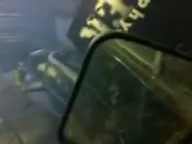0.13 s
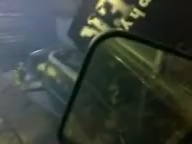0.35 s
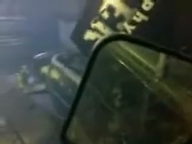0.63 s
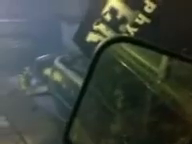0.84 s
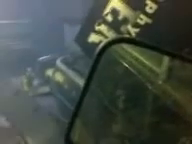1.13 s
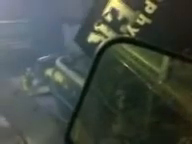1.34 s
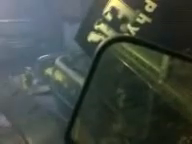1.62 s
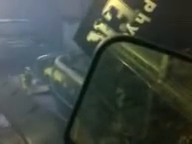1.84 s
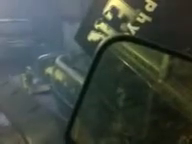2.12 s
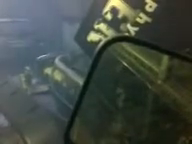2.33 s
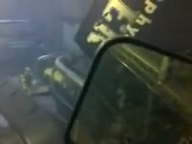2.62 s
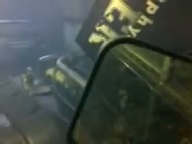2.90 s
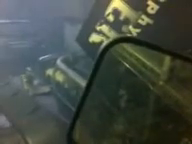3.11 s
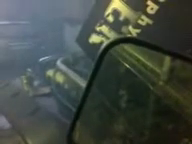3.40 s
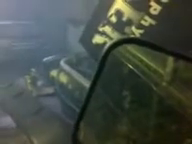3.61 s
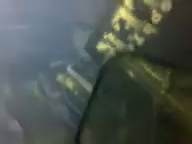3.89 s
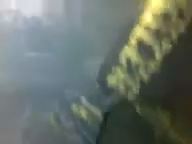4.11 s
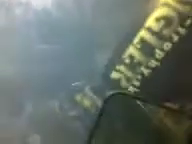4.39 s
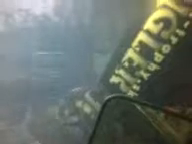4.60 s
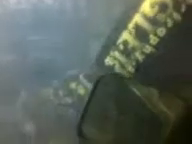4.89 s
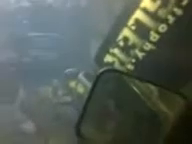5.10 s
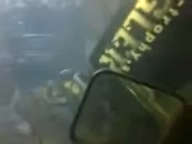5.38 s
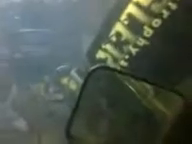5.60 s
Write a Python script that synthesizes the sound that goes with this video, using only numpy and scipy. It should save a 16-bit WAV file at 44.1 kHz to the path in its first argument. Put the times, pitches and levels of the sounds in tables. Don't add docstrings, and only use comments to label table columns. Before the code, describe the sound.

A turbocharged car engine, already at high revs, falls away quickly in an enclosed hall. Two sharp knocks crack almost together at the start, a cluster of pops follows near one second, then the roar sinks to a lumpy, hissing idle. At the very end the throttle opens and the pitch jumps up. The microphone is dull and narrow-band, overloading on the knocks.

```python
import sys
import numpy as np
from scipy import signal
from scipy.io import wavfile
from scipy.ndimage import uniform_filter1d

SR = 44100
rng = np.random.default_rng(int(sys.argv[2]) if len(sys.argv) > 2 else 0)


def nominal_scale(level):
    x = np.asarray(level, float) / 20
    return 10 ** x


def persist_wave(psi):
    counts = np.round(np.clip(psi, -1, 1) * 32767).astype(np.int16)
    wavfile.write(sys.argv[1], SR, np.atleast_2d(counts).T)


N = 254016

# time in seconds, speed in turns per second.
SPEED_TURNS_PER_S = [(0, 141), (.35, 115.6), (.7, 96.5), (.9, 93), (1.17, 68), (1.45, 59.5), (1.76, 52),
                     (2.05, 51), (2.5, 42.6), (2.75, 41.2), (3.5, 39), (4.6, 38.2), (4.95, 39), (5.5, 39),
                     (5.575, 43.5), (5.64, 51), (5.7, 57), (5.76, 62)]
# time in seconds, roar level in dB.
ROAR_DB = [(0, -16), (.46, -19), (.59, -22), (.74, -22), (.87, -25), (1.1, -27.5), (1.4, -29), (1.8, -29.5),
           (2.15, -31.5), (3.85, -33.5), (4.5, -35.5), (4.85, -35.5), (4.95, -35), (5.45, -35.5),
           (5.58, -34.5), (5.76, -30.5)]


def evened(x):
    return x / np.sqrt(np.mean(x ** 2) + 1e-20)


def curve(table, t):
    s, *columns = np.transpose(table)
    return [np.interp(t, s, c) for c in columns]


def read(points, hz):
    f, value = np.transpose(points)
    return np.interp(np.log(hz + 1), np.log(f + 1), value)


def band_db(colour_db, hz, lo, hi):
    power = nominal_scale(colour_db[:, (hz > lo) & (hz < hi)]) ** 2
    return 10 * np.log10(power.sum(1, keepdims=True))


def add(mix, s, sound):
    part = mix[round(s * SR):][:len(sound)]
    part += sound[:len(part)]


def drift(shape, size):
    once = uniform_filter1d(rng.standard_normal(shape), size, axis=0)
    return evened(uniform_filter1d(once, size, axis=0))


def field(colour_db, patchy_db, flicker_db):
    a, b, patches = rng.standard_normal((*colour_db.shape, 3)).T
    patches = uniform_filter1d(patches, size=10, axis=0)
    patches = evened(uniform_filter1d(patches, size=10, axis=1))
    flicker = drift(len(colour_db), size=3)
    z = (a + 1j * b) * nominal_scale(colour_db.T + patchy_db * patches + flicker_db * flicker)
    noise = signal.istft(z, nperseg=2048, noverlap=1536)[1]
    return noise[1024:N + 1024] * np.sqrt(512 / 3)


def stumble_db(t):
    # middle in seconds, boom change in dB, half length in seconds.
    boom_dips = [(0.052, -3, 0.046), (.21, -24, 0.035), (.31, -13.5, 0.039), (0.432, -18.5, 0.017),
                 (.68, -2, 0.078), (1.1, -11.5, 0.091), (1.294, -12.5, .04), (1.672, -11.5, .1),
                 (1.922, -8, 0.12), (2.45, -5, .04), (2.639, -8, .035), (3.633, -8, .06),
                 (3.897, -3.5, 0.091), (4.699, -3, 0.081), (5.041, -9.5, .05), (5.36, -2, .06),
                 (5.58, -19.5, 0.043), (5.656, -14, .025)]
    return sum(db * np.exp(-((t - s) / half_s) ** 2) for s, db, half_s in boom_dips)


def throttle(t):
    open_s, rise_s = 5.6, 0.1536
    return np.clip((t - open_s) / rise_s, 0, 1)


def overrun(t):
    start_s, end_s, edge_s = 1.0, 2.394, 0.09
    return np.clip(np.minimum(t - start_s, end_s - t) / edge_s + .5, 0, 1)


def air_level(t):
    idle_db, octave_db, idle_turns_per_s = -44.5, 8, 39
    return idle_db + octave_db * np.log2(curve(SPEED_TURNS_PER_S, t)[0] / idle_turns_per_s)


FUEL_BACK_S = 2.0


def crank():
    t = np.arange(N) / SR
    sag_per_db, sag_delay_s = .0035, .03
    sag = -sag_per_db * stumble_db(t - sag_delay_s) * (t > FUEL_BACK_S)
    speed = curve(SPEED_TURNS_PER_S, t)[0] * (1 - sag + .004 * drift(N, size=1500))
    return speed, np.cumsum(speed) / SR


def ticks():
    ticks_per_s = 160
    size = nominal_scale(3.2 * np.minimum(rng.exponential(1, N), 4))
    size = size * (rng.random(N) < ticks_per_s / SR) * rng.choice([-1, 1], N)
    band = signal.butter(3, [3700, 4300], "bandpass", fs=SR, output="sos")
    return nominal_scale(air_level(np.arange(N) / SR) - 28.5) * evened(signal.sosfilt(band, size))


def panel():
    # middle in seconds, peak in dB, pitch in Hz, length in seconds.
    songs = [(0.091, -19.5, 760, 0.077), (0.115, -23.5, 308.6, .08), (0.118, -33, 121.3, .07),
             (.22, -23, 485, 0.051), (0.337, -29.5, 296.5, 0.095), (0.439, -26.5, 298, 0.1),
             (0.893, -30, 300, 0.079), (.89, -24, 494, 0.056), (.92, -28.5, 227, .06),
             (0.926, -33.5, 132, 0.069), (0.652, -25, 1307, .1), (.995, -21.5, 1335, .09),
             (1.1, -24.5, 1420, 0.048), (1.147, -29, 1446, 0.042), (1.383, -25, 1340, 0.056),
             (1.621, -29, 1340, 0.062), (2.108, -29, 1306, 0.065), (1.332, -36, 3560, .05),
             (2.516, -37, 1340, 0.055), (3.183, -31.5, 1400, 0.063), (3.495, -33.5, 1090, 0.069),
             (3.755, -37.5, 1672, .1), (4.56, -36, 1680, 0.097), (4.906, -37, 1560, 0.052),
             (5.58, -32.5, 1365, 0.053), (5.625, -39, 118, 0.0495), (5.701, -34, 1355, 0.084)]
    out = np.zeros(N)
    for s, db, pitch_hz, length_s in songs:
        t = np.arange(0, length_s, 1 / SR)
        pitch_wobble, level_wobble = drift((8000, 2), size=150)[:len(t)].T
        tone = np.sin(2 * np.pi * np.cumsum(pitch_hz * (1 + 0.015 * pitch_wobble)) / SR)
        swell = nominal_scale(db + 1.0 + 2.8 * level_wobble) * np.sin(np.pi * t / length_s)
        add(out, s - length_s / 2, swell * tone)
    return out


def intake(turns):
    # crank order, level at idle in dB.
    intake_orders = [(1.5, -61), (2, -52.5), (4, -62.5), (6, -53), (9, -55.5), (12, -54.5), (15, -56.5),
                     (18, -54.5)]
    t = np.arange(N) / SR
    roar_db = uniform_filter1d(curve(ROAR_DB, t)[0], size=15000)
    tones = np.zeros(N)
    for k, db in intake_orders:
        waver_db = (1 + .15 * k) * drift(N, size=3000)
        tones += nominal_scale(db + waver_db) * np.sin(2 * np.pi * (k * turns + rng.random()))
    overrun_db = -6.5
    return tones * nominal_scale(.4 * (roar_db + 35) + overrun_db * overrun(t))


def pops():
    # start in seconds, level in dB, pitch in Hz, t60 in seconds.
    puffs = [
        (.43, -21.5, 300, 0.12),
        (.856, -19.5, 390, 0.1),
        (0.877, -9.5, 480, 0.059),
        (.884, -16, 330, 0.0475),
        (.902, -14.5, 654, 0.057),
        (.916, -19, 360, 0.08),
        (1.038, -27, 355, 0.16),
        (2.101, -26, 889, 0.049),
        (5.606, -25.5, 1300, 0.025),
    ]
    out, t = np.zeros(N), np.arange(8000) / SR
    for s, db, pitch_hz, t60_s in puffs:
        band = signal.butter(4, [.45 * pitch_hz, 2.2 * pitch_hz], "bandpass", fs=SR, output="sos")
        puff = evened(signal.sosfilt(band, rng.standard_normal(len(t))))
        add(out, s, nominal_scale(db - 60 * t / t60_s) * (1 - np.exp(-t / 0.0028)) * puff)
    return out


def knocked(engine):
    # time in seconds, peak in dB, sign.
    hard_knocks = [
        (.1177, -1, 1),
        (.124, -1, -1),
    ]
    u, hush, out = np.arange(-60, 61) / SR, np.zeros(N), np.zeros(N)
    bell = np.exp(-(u / .0005) ** 2)
    for s, db, sign in hard_knocks:
        add(hush, s - 60 / SR, bell)
        add(out, s - 60 / SR, sign * nominal_scale(db - 1.1) * np.cos(2 * np.pi * 1600 * u) * bell)
    return engine * (1 - hush) + out


def boom(speed, turns):
    # crank order, rms level on the resonance in dB.
    boom_orders = [(1, -30), (1.5, -42), (2, -35.5), (2.5, -47.5), (3, -36.5), (4, -55.5)]
    pipe_hz, pipe_width_hz, firing_width_hz = 119, 25, 28
    fuel_rise_s, fuel_cut_db, throttle_db = 0.059, -21, 6
    t = np.arange(N) / SR
    fuel = nominal_scale(fuel_cut_db * np.clip((FUEL_BACK_S - t) / fuel_rise_s + 1, 0, 1))
    out = np.zeros(N)
    for k, db in boom_orders:
        off_hz = 2 * (k * speed - pipe_hz)
        if k == 3:
            near = fuel / (1 + (off_hz / firing_width_hz) ** 2)
        else:
            near = 1 / (1 + (off_hz / pipe_width_hz) ** 2) ** 2
        out += nominal_scale(db) * near * np.sin(2 * np.pi * (k * turns + rng.random()))
    level_db = throttle_db * throttle(t) + stumble_db(t) + 1.1 * drift(N, size=2500)
    return np.sqrt(2) * nominal_scale(level_db) * out


def firing(turns, depth):
    fired = 3 * turns
    strength = rng.standard_normal(2000)[fired.astype(int) % 2000]
    throb = np.exp(-(fired % 1) / 0.35) * nominal_scale(2.9 * strength)
    return evened(1 + depth * uniform_filter1d(throb, size=30))


def bodywork_db(t, hz):
    # centre in Hz, width in Hz, level above the roar in dB.
    resonances = [(221, 45, 5), (298, 12, 7), (316, 12, 9), (340, 55, 4.5), (455.5, 52, 5),
                  (570.3, 54, 7.5), (679, 35, 4), (876.2, 10, 9), (962, 40, 2), (1090, 100, 4.5),
                  (1157, 9, 0), (1340, 34, 6), (1420, 13, 5.5), (1565, 27, 6), (1680, 33, 4),
                  (1917, 18, 1.5), (3560, 200, -1)]
    sway_db = 2.1 * drift((len(t), len(resonances)), size=5)
    power = 1
    for i, (f, width_hz, db) in enumerate(resonances):
        power = power + nominal_scale(db + sway_db[:, [i]]) ** 2 / (1 + (2 * (hz - f) / width_hz) ** 4)
    return 10 * np.log10(power)


def combustion_db(t, hz, speed, load, ring_db):
    # frequency in Hz, density in dB per Hz.
    idle_colour = [(15, -62), (25, -37), (59, -23), (100, -12.5), (169, -13), (323, -13.5), (399, -13),
                   (562, -11.5), (780, -9.5), (1100, -13.5), (1230, -12.5), (1610, -10), (1800, -12.5),
                   (2050, -22), (2500, -27.5), (3200, -62.5)]
    rev_colour = [(15, -62.5), (25, -34.5), (113, -4), (200, -7), (299, -2.5), (384, -2), (573, -1),
                  (872, 0), (1250, 0), (1770, 2), (2400, -6.5), (2900, -11.5), (3500, -30.5), (4500, -65)]
    low_db, low_top_speed_db, low_overrun_db, low_sway_db = -6, 2.5, -1.5, 0.74
    roar_db = curve(ROAR_DB, t)[0][:, None] + 0.49 * drift((len(t), 1), size=4)
    top = np.clip((speed - 115) / 25, 0, 1)
    low_db = roar_db + low_db + low_top_speed_db * top + low_overrun_db * overrun(t)[:, None]
    low_db = low_db + low_sway_db * drift((len(t), 1), size=15)
    colour_db = load * read(rev_colour, hz) + (1 - load) * read(idle_colour, hz)
    colour_db += (1 - .45 * load) * ring_db
    colour_db += roar_db - band_db(colour_db, hz, 800, 2100)
    colour_db += (low_db - band_db(colour_db, hz, 150, 800)) / (1 + (hz / 800) ** 8)
    return colour_db


def compressor_db(t, hz, load, ring_db):
    # frequency in Hz, density in dB per Hz.
    hiss_colour = [(1180, -29), (2000, -9), (2250, -7), (2810, -1.5), (3480, 3.5), (3600, -1), (3700, -6),
                   (4000, -14.5), (4220, -23.5), (4350, -32.5), (4430, -32), (4520, -46), (4700, -59.5)]
    hiss_db = air_level(t)[:, None] + 0.68 * drift((len(t), 1), size=3)
    air_db = read(hiss_colour, hz) + ring_db
    air_db += hiss_db - 0.42 * load - band_db(air_db, hz, 2400, 4200)
    air_db += 4.5 * drift((len(t), 1), size=2) / (1 + (3600 / (hz + 1)) ** 12)
    return air_db


def roar(turns):
    t = (np.arange(N // 512 + 6) * 512 - 1024) / SR
    hz = np.fft.rfftfreq(2048, 1 / SR)
    speed = curve(SPEED_TURNS_PER_S, t)[0][:, None]
    load = np.clip((speed - 45) / 70, 0, 1)
    ring_db = bodywork_db(t, hz)
    colour_db = combustion_db(t, hz, speed, load, ring_db)
    air_db = compressor_db(t, hz, load, ring_db)
    engine = field(colour_db - 20.5, patchy_db=1.0, flicker_db=-0.18) * firing(turns, depth=0.48)
    hiss = field(air_db - 21.5, patchy_db=2.0, flicker_db=0.85) * firing(turns, depth=0.31)
    return engine + hiss


def scene():
    speed, turns = crank()
    engine = ticks() + panel() + intake(turns) + pops() + boom(speed, turns) + roar(turns)
    rounded = engine / (1 + (engine / .66) ** 8) ** (1 / 8)
    return knocked(rounded)[None]


def top_cut(x):
    return signal.sosfilt(signal.butter(12, 16000, fs=SR, output="sos"), x)


def record(dry):
    edge_hz, ceiling = 4620, .708
    lowpass = signal.firwin(1023, edge_hz, window=("kaiser", 10), fs=SR)
    narrow = signal.oaconvolve(dry, lowpass[None], "same")
    from_end = np.minimum(np.arange(N), np.arange(N)[::-1])
    narrow *= np.minimum(from_end / 20 + .3, 1)
    return top_cut(np.clip(narrow, -ceiling, ceiling))


dry = scene()
out = record(dry)
persist_wave(out)
```